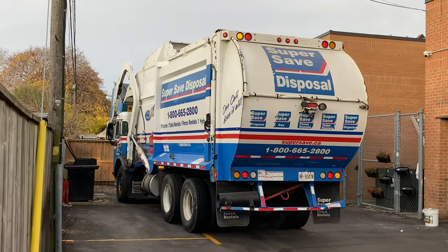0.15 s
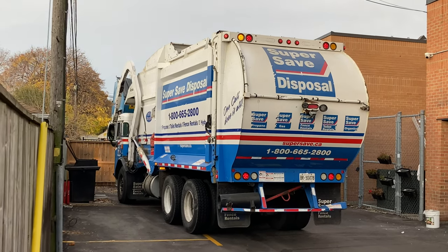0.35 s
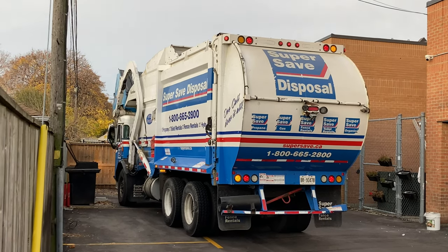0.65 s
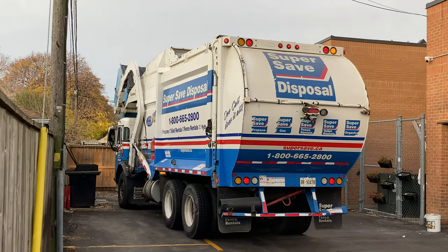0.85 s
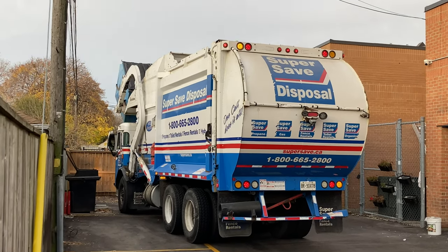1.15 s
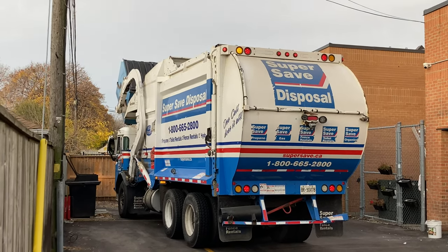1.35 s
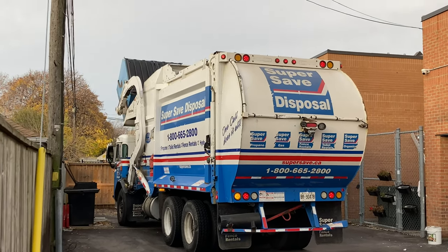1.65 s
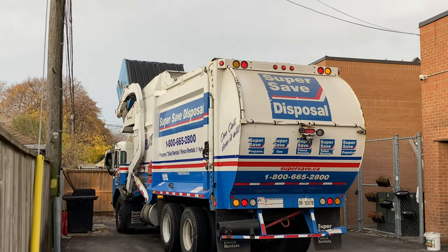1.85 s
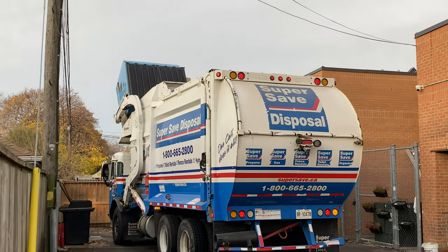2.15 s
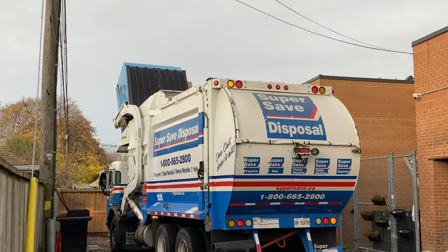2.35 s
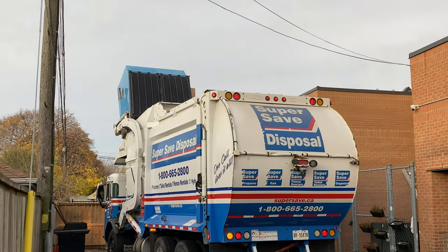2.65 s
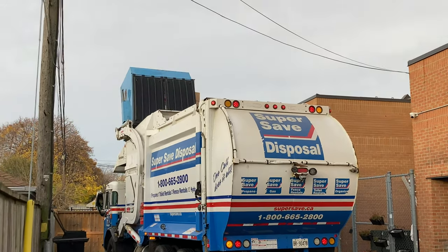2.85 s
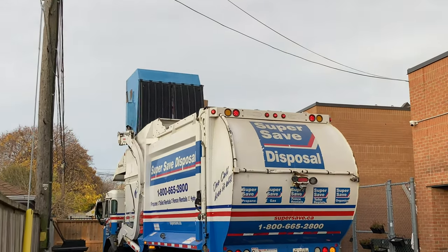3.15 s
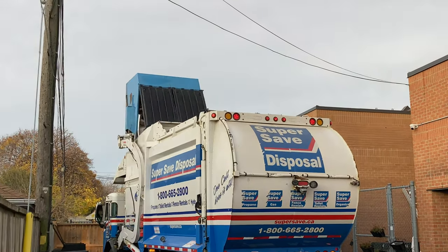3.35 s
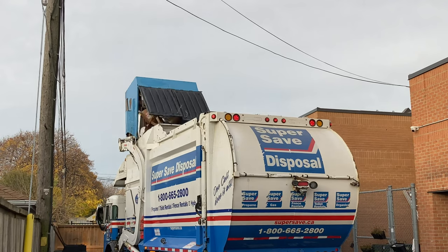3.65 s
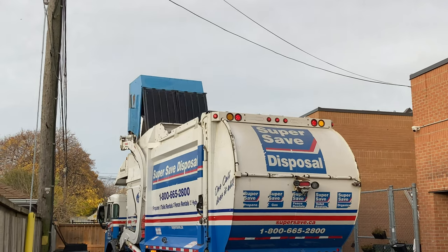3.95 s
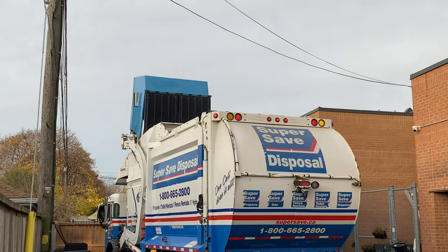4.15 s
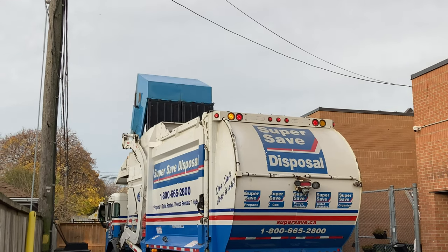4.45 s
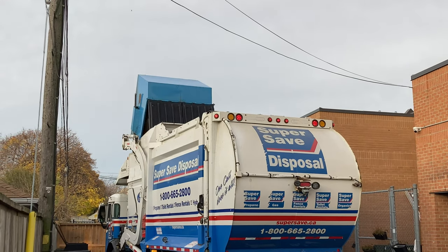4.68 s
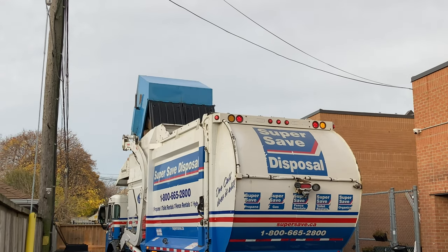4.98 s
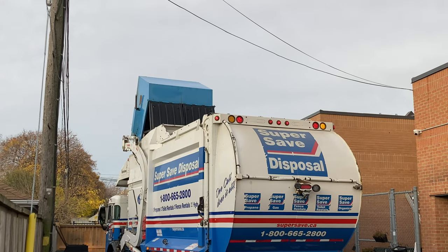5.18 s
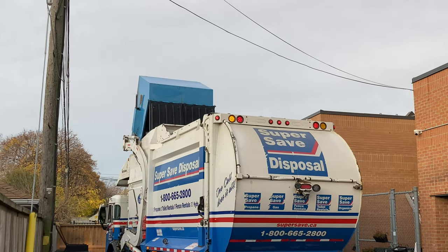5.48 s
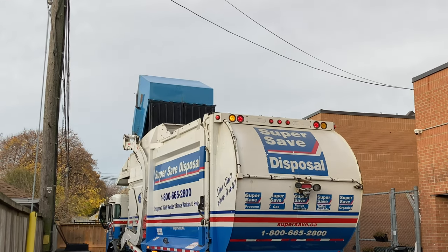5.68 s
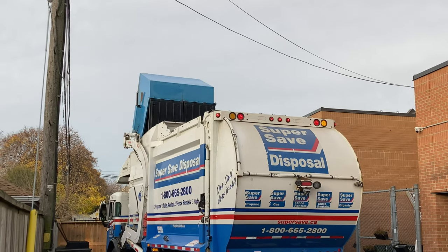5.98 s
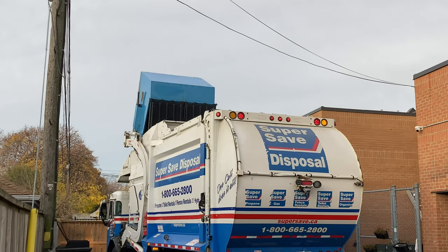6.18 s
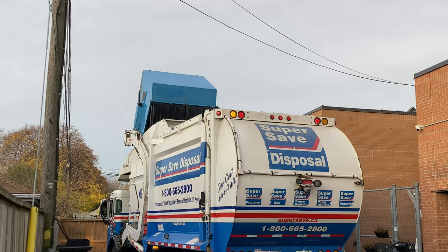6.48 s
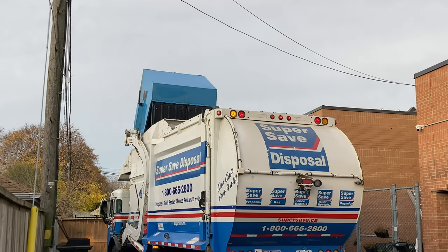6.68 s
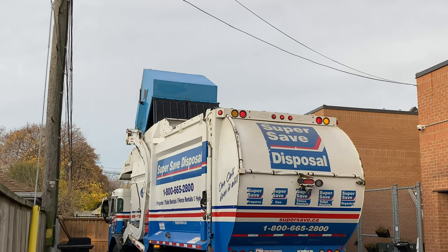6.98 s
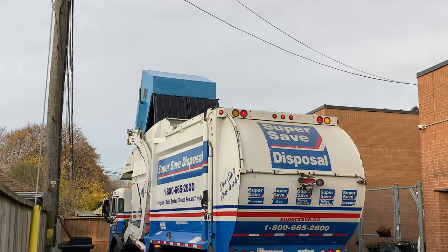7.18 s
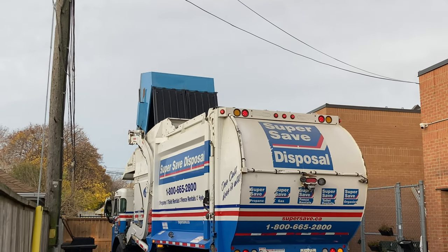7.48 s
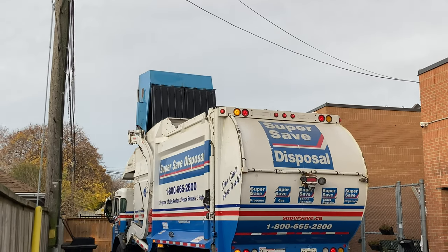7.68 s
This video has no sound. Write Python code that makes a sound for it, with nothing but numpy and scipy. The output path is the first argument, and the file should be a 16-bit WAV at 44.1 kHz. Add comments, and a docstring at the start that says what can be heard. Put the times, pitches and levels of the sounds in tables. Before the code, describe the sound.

A heavy diesel roars under load, with wavering gear and hydraulic whine, rising briefly then sagging. The throttle drops with a sharp air release and the lift arms clank against their stops. Rubbish slides and lumps thud into the hopper, followed by hollow steel crashes and clanking forks. Idle rumble and fading ring fill a gap before another quick cluster of bangs. Handheld stereo pickup from several metres away, with hard wall reflections.

```python
"""Garbage truck emptying a steel bin

A front-loading truck in a brick-walled lot lifts a steel bin over its cab: crank-locked tones and
pulsed noise make the diesel, wavering pure tones the gear and pump whine, shaped noise the hiss and air valve.
The engine drops to idle, the arms hit their stops and rubbish slides out as dense random contacts.
Two bouts of bangs against the hopper, made of noise bursts and decaying modes, boom on between the walls."""
import sys
import numpy as np
from scipy import signal
from scipy.fft import rfft, irfft, next_fast_len
from scipy.io import wavfile
from scipy.ndimage import uniform_filter1d

SR = 44100
rng = np.random.default_rng(int(sys.argv[2]) if len(sys.argv) > 2 else 0)


def bounce(signal):
    """Save signal as a 16-bit WAV file at the path given by the first command-line argument."""
    frames = np.transpose(np.atleast_2d(signal))
    limited = np.clip(frames, -1, 1)
    pcm = np.round(limited * 32767).astype(np.int16)
    wavfile.write(sys.argv[1], SR, pcm)


N = 345303
TIME = np.arange(N) / SR


def from_db(db):
    """Level to amplitude ratio: 20 dB is a factor of ten."""
    return 10 ** (np.asarray(db) / 20)


def rms_one(x):
    """Normalisation to unit mean power."""
    return x / np.sqrt(np.mean(x ** 2) + 1e-20)


def in_time(rows):
    """Linear interpolation of a two-column curve over the whole scene."""
    times, values = np.transpose(rows)
    return np.interp(TIME, times, values)


def at_hz(points, hz):
    """Interpolation on a logarithmic frequency axis."""
    frequencies, values = np.transpose(points)
    return np.interp(np.log(hz), np.log(frequencies), values)


def drift(rate):
    """Slow random modulation: smooth chance of unit spread with a new value rate times a second."""
    knots = rng.standard_normal(N // 40)
    return rms_one(np.interp(TIME * rate, np.arange(len(knots)), knots))


def since(start_s):
    """Elapsed time after an onset [s], zero before it."""
    return np.maximum(TIME - start_s, 0)


def add(out, start_s, sound):
    """Superposition: mix a sound in from a given moment."""
    start = int(start_s * SR)
    out[:, start:start + sound.shape[-1]] += sound[..., :N - start]


# interaural likeness of a diffuse sound: (frequency [Hz], left-right correlation)
EAR_LIKENESS = [(150, .99), (270, .88), (500, .64), (780, .72), (1080, .45), (1400, .25), (2100, .6),
                (2700, .4), (5000, .52), (7000, .8), (9200, .9), (14000, .85)]


def noise(spectrum, tilt_db=0, edge_hz=np.inf, size=N):
    """Partly coherent stereo noise of unit power, shaped by a spectrum and a tilt in dB per octave."""
    padded = next_fast_len(size, True)
    hz = np.maximum(np.arange(padded // 2 + 1) * SR / padded, 1)
    alike = np.clip(at_hz(EAR_LIKENESS, hz), 0, 1)
    mid, side = rfft(rng.standard_normal((2, padded)))
    pair = np.sqrt(1 + alike) * mid + np.sqrt(1 - alike) * side * [[1], [-1]]
    tilt = tilt_db * np.log2(np.maximum(hz, 150))
    treble_loss = np.hypot(1, (hz / edge_hz) ** 2)
    gain = from_db(at_hz(spectrum, hz) + tilt) / treble_loss
    return rms_one(irfft(pair * gain, padded)[:, :size])


def clatter(per_s, size_db, decay_s):
    """Shot-noise envelope of unit power: random small contacts of uneven size, each dying quickly."""
    sizes = from_db(size_db * np.minimum(rng.exponential(1, N), 4))
    contacts = sizes ** 2 * (rng.random(N) < per_s / SR)
    decay = np.exp(-2 / (decay_s * SR))
    power = signal.lfilter([1], [1, -decay], contacts + 1e-12)
    return rms_one(np.sqrt(power))


def swell(start_s, length_s, rise_s, fall_s, tail_db, tail_t60):
    """Build-up and two-slope decay: a quick release leaves a longer tail between the walls."""
    after = since(start_s + length_s)
    tail_share = from_db(tail_db)
    release = (1 - tail_share) * np.exp(-after / fall_s)
    tail = tail_share * from_db(-60 * after / tail_t60)
    return (1 - np.exp(-since(start_s) / rise_s)) * (release + tail)


def tone(cycles, waver, wander, flutter_hz=9):
    """Multipath fading: a line's strength and phase waver as its echoes off the walls shift."""
    shared = 1 + waver * (drift(flutter_hz) + 1j * drift(flutter_hz))
    each_ear = wander * np.array([drift(3.69) + 1j * drift(2.4) for ear in range(2)])
    return rms_one(np.real((shared + each_ear) * np.exp(2j * np.pi * cycles)))


def firing(turns, fall_db, uneven_db=0.4):
    """Cyclic excitation: six cylinders of uneven level take turns over two crank turns."""
    count = 6
    beats = turns * count / 2
    cylinder_db = uneven_db * rng.standard_normal(count)
    # a negative fall makes the level rise from one firing to the next
    level_db = cylinder_db[beats.astype(int) % count] - fall_db * (beats % 1)
    return rms_one(uniform_filter1d(from_db(level_db), size=130))


# body panels that the engine shakes: (frequency [Hz], width [Hz], boost [dB])
BODY_PANELS = [(158.6, 14, 3.5), (198.7, 8.4, 4.5), (237, 6.8, 2)]


def body_panels(x, drive):
    """Forced resonance: while the engine is driven hard, the body panels drone at their own pitches."""
    out = x
    for hz, width_hz, db in BODY_PANELS:
        resonance = signal.lfilter(*signal.iirpeak(hz, hz / width_hz, fs=SR), x)
        out = out + drive * (from_db(db) - 1) * resonance
    return out


# resonances of the drive casing: (frequency [Hz], width [Hz], boost [dB])
CASING_MODES = [(666, 16, 6), (690, 20, 3.5), (1082, 9, 11.5), (1116, 22, 17), (2163, 10, 10),
                (2382, 22, 16), (4518, 11, 12.5), (4725, 70, 12)]


def casing(hz):
    """Resonant amplification: a whine swells as its pitch sweeps through a casing mode."""
    gain = 1
    for centre, width, db in CASING_MODES:
        gain = gain + (from_db(db) - 1) / (1 + (2 * (hz - centre) / width) ** 2)
    return gain


def whine(crank_hz, order, db):
    """Order tracking: a nearly pure tone locked to the crank and coloured by the casing."""
    hz = order * crank_hz
    line = tone(np.cumsum(hz) / SR, waver=0.34, wander=0.27, flutter_hz=36)
    return from_db(db) * casing(hz) * line


# swells of low roar and hiss: the long lift first, then the rumble and hiss around the sliding
# rubbish and the bangs: (start [s], length [s], roar level [dB], hiss level [dB])
ROAR_AND_HISS_SWELLS = [(-0.2, 3.21, -15.5, -39.5), (3.536, 0.53, -24.5, -42.5),
                        (3.972, 0.287, -17.5, -41.5), (4.227, 0.15, -18.5, -29.5), (6.14, 0.16, -55, -50),
                        (6.706, 0.25, -26, -46.5), (7.145, 0.17, -34, -56), (7.49, 0.11, -44, -47.5)]
HISS_FLOOR_DB = -61


def roar_and_hiss():
    """Power summation: every swell raises the roar and the hiss, each with its own tail."""
    roar_level, hiss_level = 0, from_db(HISS_FLOOR_DB)
    for start_s, length_s, roar_db, hiss_db in ROAR_AND_HISS_SWELLS:
        shape = dict(rise_s=0.15, fall_s=0.0087, tail_db=-4)
        roar_swell = from_db(roar_db) * swell(start_s, length_s, **shape, tail_t60=4.44)
        hiss_swell = from_db(hiss_db) * swell(start_s, length_s, **shape, tail_t60=1.26)
        roar_level = np.hypot(roar_level, roar_swell)
        hiss_level = np.hypot(hiss_level, hiss_swell)
    return roar_level, hiss_level


# the engine revs up, then sags under the bin's weight: (time [s], gear mesh frequency [Hz])
MESH_SPEED = [(0, 925), (0.3, 1062), (0.48, 1119), (0.7, 1145), (0.92, 1151), (1.06, 1144), (1.3, 1106),
              (1.5, 1092), (2.0, 1081), (2.25, 1081), (2.55, 1084.5), (2.95, 1081)]
# gear whine as the teeth take more or less load: (time [s], level [dB])
GEAR_LOAD = [(0.15, 7), (0.55, -2), (0.9, 0), (1.27, 0), (1.4, -4), (1.55, 0), (2.0, 0), (2.3, 2),
             (2.55, -2.5), (2.9, 2)]
# tones within the roar: (cycles per crank turn, level against the roar level [dB])
ENGINE_ORDERS = [(3, -16.5), (3.5, -20.5), (4.5, -17.5), (6.5, -15), (7, -18), (8, -11), (8.5, -18),
                 (9, -10.5), (10.5, -17.5), (11, -17), (15, -16.5)]
# spectra of the roar, combustion rattle and idle: (frequency [Hz], density [dB per Hz])
ROAR_SPECTRUM = [(25, -53), (42, -22), (66, -1.5), (110, -6.5), (145, -1.5), (185, -4.5), (260, -4),
                 (320, -5.5), (390, -15), (680, -13.5), (900, -19.5), (1150, -20.5), (1350, -27.5),
                 (1850, -30), (2300, -33.5), (2900, -35.5), (8000, -54.5)]
RATTLE_SPECTRUM = [(330, -14), (480, 5), (640, 7), (830, -3.5), (1200, -5.5), (1700, -28.5)]
IDLE_SPECTRUM = [(25, -28), (42, -9.5), (65, -2), (130, -6), (200, -8.5), (310, -11.5), (400, -23),
                 (1000, -21), (1350, -32.5), (2200, -35), (3100, -42), (4500, -45), (7500, -49),
                 (15000, -79)]
GEAR_TEETH, HUM_ORDER, PUMP_ORDER = 49, 30, 102.1  # cycles per crank turn
IDLE_TURNS_HZ, IDLE_DB = 10.77, -32.5
THROTTLE_OFF_S, RUN_DOWN_S = 3.0, 0.49


def truck(roar_level):
    """Harmonic orders: diesel, pump and gears follow the crank, which runs down to idle after the lift."""
    throttle = np.exp(-since(THROTTLE_OFF_S) / RUN_DOWN_S)
    pressure = throttle ** 6  # as the pump is unloaded, its whine fades six times faster
    crank_hz = IDLE_TURNS_HZ + (in_time(MESH_SPEED) / GEAR_TEETH - IDLE_TURNS_HZ) * throttle
    turns = np.cumsum(crank_hz) / SR

    pulses = firing(turns, fall_db=0)
    roar = from_db(-1) * noise(ROAR_SPECTRUM) * pulses
    rattle_db = -10.5 + 5 * (crank_hz - 23.3)  # combustion hardens by 5 dB per turn a second
    rattle = from_db(rattle_db) * noise(RATTLE_SPECTRUM) * pulses
    tones = 0
    for order, db in ENGINE_ORDERS:
        tones = tones + from_db(db) * tone(order * turns, waver=0.35, wander=0.028)
    swelling = roar_level * (body_panels(roar + tones * throttle, drive=throttle) + rattle)

    gear_db = in_time(GEAR_LOAD)
    gears = whine(crank_hz, GEAR_TEETH, gear_db - 44.5)
    gears = gears + whine(crank_hz, 2 * GEAR_TEETH, gear_db - 58.5)
    rev_boost_db = 9.5 * np.exp(-TIME / 0.7)  # the pump whines harder while the engine revs up
    pump = whine(crank_hz, PUMP_ORDER, rev_boost_db - 57)
    pump = pump + whine(crank_hz, 2 * PUMP_ORDER, -57.5)
    pump = pump + whine(crank_hz, HUM_ORDER, -34.3)

    exhaust = tone(6 * turns, waver=0.35, wander=0.05)  # twice the firing rate
    idle = noise(IDLE_SPECTRUM) * firing(turns, fall_db=-1.5)
    idle = idle + from_db(-6) * (1 - throttle) * exhaust
    return swelling + pressure * (gears + pump) + from_db(IDLE_DB) * idle


# hiss spectrum: (frequency [Hz], density [dB per Hz])
HISS_SPECTRUM = [(2000, -13), (4400, 4.5), (6000, -1.5), (9000, -1), (11000, 3), (13000, -11), (16000, -39)]


def hiss(hiss_level):
    """Amplitude-modulated broadband noise: a treble hiss swells and flickers slightly."""
    return hiss_level * from_db(0.74 * drift(28)) * noise(HISS_SPECTRUM)


# the two pipe resonances: (frequency [Hz], density [dB per Hz])
PIPE_SPECTRUM = [(1500, -40), (2000, -16), (2200, 0.5), (2380, -2), (2600, -19), (3900, -9), (4450, -9),
                 (5200, -48)]


def pipes(hiss_level):
    """Excited resonance: two pipe bands ring along with the hiss, and each knock of the arms jolts them."""
    drive = from_db(-4.5) * hiss_level
    for start_s, db, *_ in ARM_KNOCKS:
        t = since(start_s)
        jolt = from_db(db - 15 - 60 * t / 1.2) * (1 - np.exp(-t / 0.09))
        drive = np.hypot(drive, jolt)
    return drive * noise(PIPE_SPECTRUM) * clatter(per_s=460, size_db=5.5, decay_s=0.02)


# air valve releases: (time [s], level [dB], hold [s], decay [s])
AIR_PUFFS = [(2.933, -13, 0.028, 0.049), (4.168, -31, 0.036, 0.011)]
# jet spectrum: (frequency [Hz], density [dB per Hz])
AIR_SPECTRUM = [(900, -15), (2200, 2), (3200, 0.5), (5500, 5.5), (8000, 0.5), (11500, 2), (13500, -9),
                (16000, -7.5)]


def air_valve():
    """Jet noise: it opens fast, holds and dies as its line empties; the walls return a little of it."""
    gate = 0
    for start_s, db, hold_s, decay_s in AIR_PUFFS:
        t = since(start_s)
        jet = np.exp(-np.maximum(t - hold_s, 0) / decay_s)
        returned = from_db(-6 - 60 * t / 0.83)
        opening = 1 - np.exp(-(t / 0.022) ** 2)
        gate = gate + from_db(db) * opening * np.hypot(jet, returned)
    return gate * noise(AIR_SPECTRUM)


# loose latch clacking: (time [s], level [dB], decay [s])
LATCH_CLACKS = [(6.001, -28, 0.016), (6.016, -33.5, 0.061)]
# clack spectrum: (frequency [Hz], density [dB per Hz])
LATCH_SPECTRUM = [(200, -35), (620, 8.5), (780, 4), (950, 4), (1250, -5), (1750, -2), (2600, -9),
                  (5000, -17), (11000, -24), (16000, -38)]


def latch():
    """Impact noise: a loose latch clacks twice as the arms take up their slack."""
    gate = 0
    for start_s, db, decay_s in LATCH_CLACKS:
        t = since(start_s)
        gate = gate + from_db(db) * (1 - np.exp(-t / 0.0035)) * np.exp(-t / decay_s)
    return gate * noise(LATCH_SPECTRUM)


def tumble(per_s, t60, count):
    """Impulse-driven resonators: hard pieces knock at random, each with a pitch and place of its own."""
    out = np.zeros((2, N))
    radius = from_db(-60 / (t60 * SR))
    for hz in np.geomspace(450, 6500, count):
        angle = 2 * np.pi * hz * rng.normal(1, 0.044) / SR
        moments = rng.random(N) < per_s / count / SR
        knocks = moments * rng.uniform(-0.89, 1, N) * hz ** -0.5
        poles = [1, -2 * radius * np.cos(angle), radius ** 2]
        ring = signal.lfilter([0, np.sin(angle)], poles, knocks + 1e-18)
        out += ring * rng.uniform(0.12, 1, (2, 1))
    return rms_one(out)


# loads sliding down the bin wall: (start [s], length [s], level [dB])
SLIDES = [(3.142, 0.3, -27), (3.511, 0.44, -30), (4.138, 0.024, -27.5), (4.318, 0.042, -21.5)]
# scrape spectrum: (frequency [Hz], density [dB per Hz])
SCRAPE_SPECTRUM = [(300, 9), (900, 10.5), (1600, 1.5), (2200, 5.5), (2800, -5), (4500, -0.5), (7000, 1.5),
                   (9000, -3.5), (11000, -28), (16000, -41)]


def rubbish():
    """Friction as dense impacts: rubbish scrapes the steel, with harder pieces tumbling along."""
    power = 0
    for start_s, length_s, db in SLIDES:
        slide = swell(start_s, length_s, rise_s=0.038, fall_s=0.079, tail_db=-22, tail_t60=1.4)
        power = power + (from_db(db) * slide) ** 2
    scrape = noise(SCRAPE_SPECTRUM) * clatter(per_s=900, size_db=3, decay_s=0.011)
    return np.sqrt(power) * (scrape + from_db(-5) * tumble(per_s=320, t60=0.13, count=36))


def strike(modes, rise_s, t60):
    """Modal superposition: one blow rings every mode with a strength and phase of its own."""
    t = np.arange(SR) / SR
    hz, db = np.transpose(modes)
    gain = from_db(db + rng.normal(0, 1.2, len(hz)))
    phase = rng.uniform(0, 2 * np.pi, (len(hz), 1, 1)) + rng.normal(0, 0.24, (len(hz), 2, 1))
    rings = sum(g * np.sin(2 * np.pi * f * t + p) for f, g, p in zip(hz, gain, phase))
    unit_power = rings / np.sqrt(np.sum(gain ** 2) / 2)
    return unit_power * (1 - np.exp(-t / rise_s)) * from_db(-60 * t / t60)


# forks clanking in the bin's steel pockets: (time [s], level [dB], t60 [s])
FORK_CLANKS = [(3.239, -28, 0.28), (4.405, -22.5, 0.21), (4.432, -25, 0.36), (6.015, -35, 0.09),
               (6.364, -23.5, 0.22), (6.39, -37, .5)]
# ringing steel of the pockets: (frequency [Hz], level [dB])
POCKET_MODES = [(1165, -5), (1400, -1), (1490, 5.5), (1640, -3), (1715, 2), (1945, 0), (2105, 2),
                (2190, -1.5), (2330, -8)]


def forks():
    """Modal ringing with chatter: the bin jumps on the forks and its pockets clank."""
    out = np.zeros((2, N))
    for start_s, db, t60 in FORK_CLANKS:
        add(out, start_s, from_db(db) * strike(POCKET_MODES, rise_s=0.0022, t60=t60))
    return out * clatter(per_s=290, size_db=6.5, decay_s=0.017)


# heavy lumps dropping against the bin and into the hopper: (time [s], level [dB], pitch [Hz])
LUMP_DROPS = [(3.119, -13, 138), (3.362, -23, 310), (3.87, -16, 137), (4.02, -14.5, 264), (4.289, -9, 140),
              (4.34, -18, 140), (4.439, -25, 251), (4.634, -28, 144), (4.761, -13, 152), (4.912, -22, 250),
              (5.028, -18, 200), (5.068, -26, 296), (6.02, -23, 249), (6.408, -18, 239), (6.5, -21, 236),
              (6.648, -21, 310), (6.728, -22, 299)]
# the struck floor panel: (multiple of the pitch, level [dB])
FLOOR_MODES = [(0.62, -2), (1, 0.5), (1.21, -1), (1.9, -13), (2.9, -15)]


def thuds():
    """Damped plate modes: soft, heavy lumps each set a steel panel booming briefly."""
    out = np.zeros((2, N))
    for start_s, db, pitch_hz in LUMP_DROPS:
        modes = [(pitch_hz * multiple, mode_db) for multiple, mode_db in FLOOR_MODES]
        add(out, start_s, from_db(db) * strike(modes, rise_s=0.0033, t60=0.14))
    return out


# resonances of the hopper walls: (frequency [Hz], level [dB])
HOPPER_MODES = [(1450, -1), (1570, 1), (1700, -2), (1935, 0), (2140, -1), (2300, -2), (2900, -8),
                (4250, -9), (4520, -6), (4720, -9)]


def hopper():
    """Sympathetic resonance: bangs keep the steel walls singing, each mode surging on its own."""
    drive = 0
    for start_s, db, _, _, tail_db, _ in BIN_BANGS:
        t = since(start_s)
        drive = np.hypot(drive, from_db(db + tail_db - 60 * t / 2.9) * (1 - np.exp(-t / 0.023)))
    shaking = noise([(20, 0), (20000, 0)])  # white
    walls, width_hz = 0, 26
    for hz, db in HOPPER_MODES:
        resonance = signal.lfilter(*signal.iirpeak(hz, hz / width_hz, fs=SR), shaking)
        walls = walls + from_db(db + 3.5 * drift(16)) * resonance
    return from_db(-20.5) * drive * rms_one(walls)


def steel(blows, spectrum, modes, tail_t60, treble_t60, rise_s, boom_rise_s, modes_db, rattle):
    """High modal density: a blow crashes countless panel modes and a few strong ones; walls prolong it."""
    out, size = np.zeros((2, N)), 3 * SR
    t = np.arange(size) / SR
    split = signal.butter(2, 1200, fs=SR, output="sos")
    for start_s, db, bright_db, crash_s, tail_db, edge_hz in blows:
        plates = noise(spectrum, bright_db, edge_hz, size=size)
        low = signal.sosfiltfilt(split, plates)
        crash = np.exp(-t / crash_s)
        surges = from_db(2.3 * (drift(30)[:size] - 0.5))  # the boom dies unevenly
        boom = low * np.hypot(crash, surges * from_db(tail_db - 60 * t / tail_t60))
        clash = (plates - low) * np.hypot(crash, from_db(tail_db - 60 * t / treble_t60))
        shake = 2 + rattle * (clatter(per_s=630, size_db=-1, decay_s=0.0033)[:size] - 1)
        rings = 0
        for hz, mode_db, t60 in modes:
            phase = rng.uniform(0, 2 * np.pi) + rng.normal(0, 0.14, (2, 1))
            pitch_hz = hz * rng.normal(1, 0.00876)
            rings = rings + from_db(mode_db - 60 * t / t60) * np.sin(2 * np.pi * pitch_hz * t + phase)
        # big panels take longer to get going
        body = (1 - np.exp(-t / boom_rise_s)) * (boom + from_db(modes_db) * rings)
        treble = (1 - np.exp(-t / rise_s)) * clash * shake
        add(out, start_s, from_db(db) * (body + treble))
    return out


# steel knocks of the lift arms: (time [s], level [dB], brightness [dB per octave],
# crash decay [s], tail level [dB], treble edge [Hz])
ARM_KNOCKS = [(3.115, -18, -2, 0.12, -8, 16000), (3.166, -12, 1, 0.035, -6.5, 16000),
              (3.235, -25, 3.5, 0.15, -17, 16000), (6.363, -26, -2, 0.015, -12, 8000),
              (6.402, -18, -5.5, 0.028, -3, 7940)]
# arm spectrum: (frequency [Hz], density [dB per Hz])
ARM_SPECTRUM = [(30, -21), (80, 6), (280, 4), (380, 0.5), (480, 2), (950, -4), (1300, -14), (2250, -18.5),
                (2900, -19), (6500, -21), (11500, -24.5), (15200, -46)]
# ringing steel of the arms: (frequency [Hz], level [dB], t60 [s])
ARM_MODES = [(258, -10, 0.98), (447, -5.5, 0.15), (487, -2, 0.25), (544, -13, 0.44), (758, -10.5, 0.32),
             (922, -11, 0.27), (1013, -14.5, 0.085), (1100, -13, 0.69), (1410, -14.5, 0.16)]


def lift_arms():
    """Structural impact: the arms knock against their stops and their steel rings."""
    return steel(ARM_KNOCKS, ARM_SPECTRUM, ARM_MODES, tail_t60=2.2, treble_t60=1.3,
                 rise_s=0.0018, boom_rise_s=0.0025, modes_db=3, rattle=0.6)


# the bin against the hopper: (time [s], level [dB], brightness [dB per octave],
# crash decay [s], tail level [dB], treble edge [Hz])
BIN_BANGS = [(4.04, -24, -2.5, 0.097, -6, 12000), (4.258, -14.5, 0.5, 0.086, 2.5, 14000),
             (4.315, -19, 0.5, 0.11, -15, 16000), (4.412, -16, 0, 0.079, -7, 16000),
             (4.72, -25, 1, 0.026, -10.5, 14000), (4.77, -24, -0.5, 0.037, -6, 14000),
             (5.03, -27, -1.5, 0.06, -11, 14000), (6.36, -14.5, 0.94, 0.019, -3, 8400),
             (6.388, -16, -2.5, 0.018, -0.5, 8500), (6.474, -23, 1, 0.026, -7, 8500)]
# bin spectrum: (frequency [Hz], density [dB per Hz])
BIN_SPECTRUM = [(25, -9), (65, 2), (110, 1), (142, 5), (188, -7), (240, 7), (280, 2.5), (325, 7.5),
                (385, -2), (520, -3.5), (1050, -10), (1350, -19), (2200, -25), (2800, -24.5), (3800, -26),
                (4600, -21), (5400, -24), (7500, -31.5), (11500, -35), (15200, -37)]
# ringing steel of the bin: (frequency [Hz], level [dB], t60 [s])
BIN_MODES = [(132.8, -9, 1.2), (154.7, -20.5, 1.6), (239, -6, 0.92), (321.3, -10.5, 2.84), (463, -1, 0.28),
             (569, -14, 0.52), (652, -16, 0.43), (760, -10.5, 0.61), (993, -13, 0.71), (1153, -15, 0.33),
             (1943, -20, 1.2), (2100, -28, 1)]


def bin_bangs():
    """Impact on a hollow shell: the bin bangs the hopper and its large panels boom."""
    return steel(BIN_BANGS, BIN_SPECTRUM, BIN_MODES, tail_t60=2.35, treble_t60=2.25,
                 rise_s=0.0031, boom_rise_s=0.006, modes_db=-0.5, rattle=0.71)


def reflections(x, echo_db, count):
    """Comb filtering: short echoes off the truck's sides, the fence and the ground comb the treble."""
    treble = signal.sosfilt(signal.butter(2, 1500, "high", fs=SR, output="sos"), x)
    out = x.copy()
    for delay_s in rng.uniform(0.003, 0.02, count):
        add(out, delay_s, from_db(echo_db) * rng.choice([-1, 1]) * treble)
    return out


def scene():
    """Superposition: all sources sound from the truck, in the narrow lot."""
    roar_level, hiss_level = roar_and_hiss()
    machinery = truck(roar_level) + hiss(hiss_level) + pipes(hiss_level) + air_valve() + latch()
    contents = rubbish() + thuds()
    impacts = forks() + hopper() + lift_arms() + bin_bangs()
    return reflections(machinery + contents + impacts, echo_db=-18.5, count=6)


# phase between the microphone ports: (frequency [Hz], lead of the left [rad])
PORT_PHASE = [(450, 0), (1100, .4), (1800, -1.4), (2600, 2), (4500, 2.2), (5200, 3), (7100, 0),
              (9150, -3.14), (11400, -6.3), (13700, -9.42), (15500, -12.5)]
CUTOFF_HZ = 15600


def record(dry):
    """Port phase and band limits: left favours the middle, right the bass; peaks are rounded."""
    hz = np.arange(N + 1) * SR / (2 * N)
    lead = np.interp(hz, *np.transpose(PORT_PHASE))
    right = irfft(rfft(dry[1], 2 * N) * np.exp(-1j * lead))[:N]
    ports = np.array([dry[0], right])
    middle = signal.sosfilt(signal.butter(1, [300, 2200], "band", fs=SR, output="sos"), ports)
    bass = signal.sosfilt(signal.butter(1, 110, fs=SR, output="sos"), ports)
    coloured = ports + (0.094 * middle - 0.11 * bass) * [[1], [-1]]
    no_rumble = signal.sosfilt(signal.butter(2, 32, "high", fs=SR, output="sos"), coloured)
    rounded = 1.2 * np.tanh(no_rumble / 1.2)
    return signal.sosfilt(signal.ellip(10, 0.1, 80, CUTOFF_HZ, fs=SR, output="sos"), rounded)


dry = scene()
out = record(dry)
bounce(out)
```